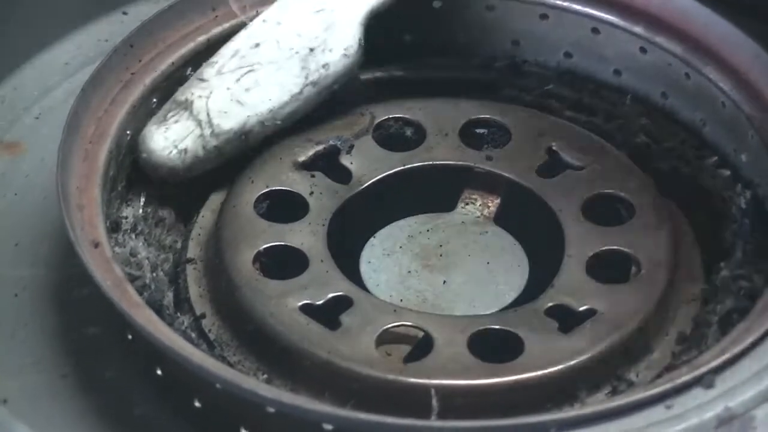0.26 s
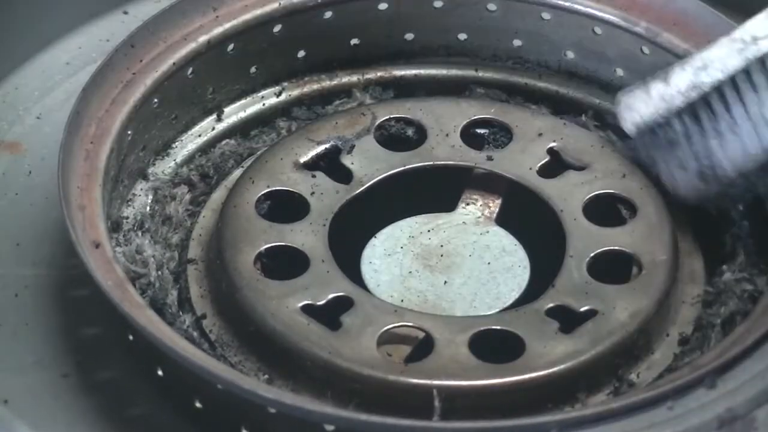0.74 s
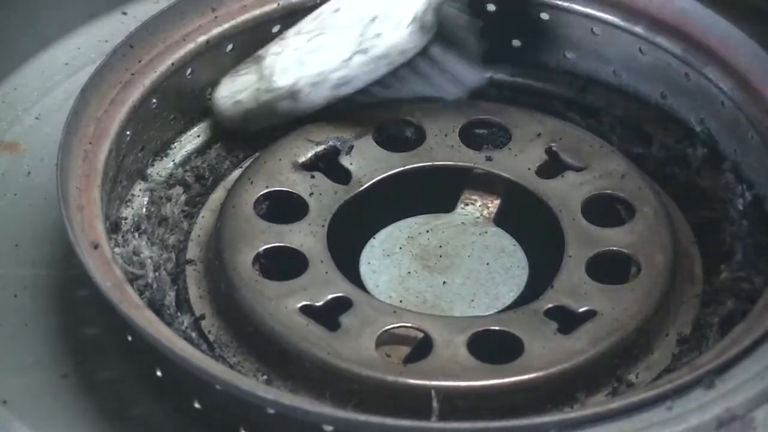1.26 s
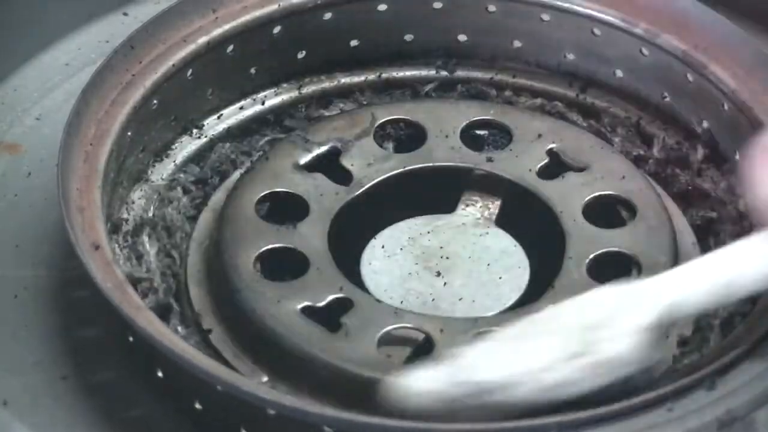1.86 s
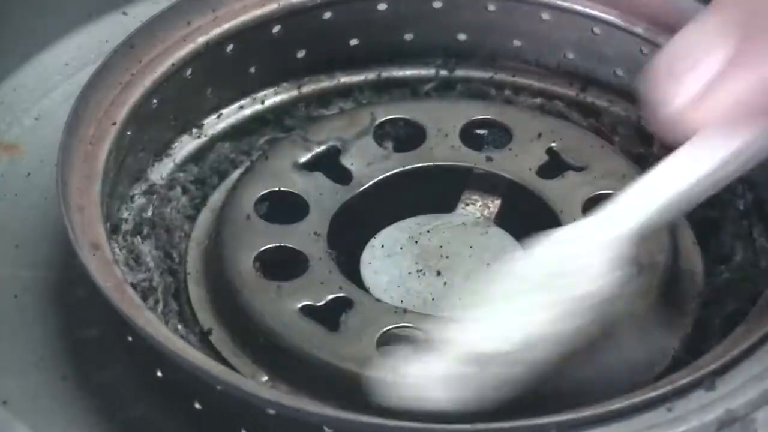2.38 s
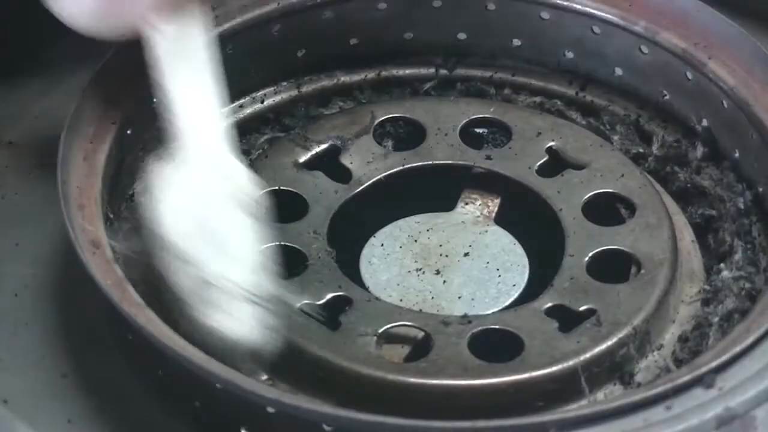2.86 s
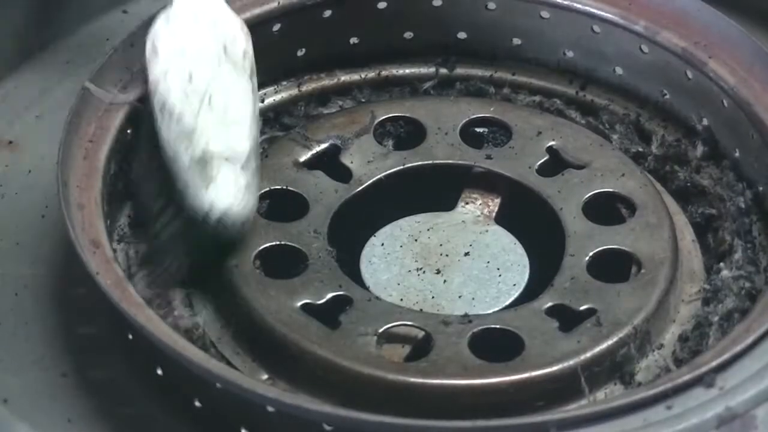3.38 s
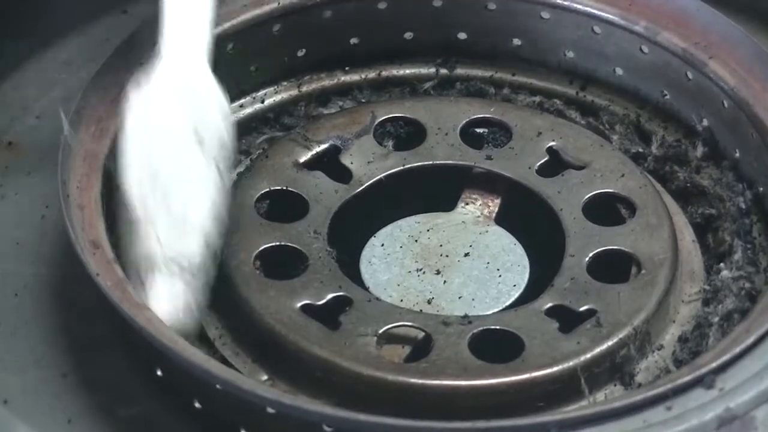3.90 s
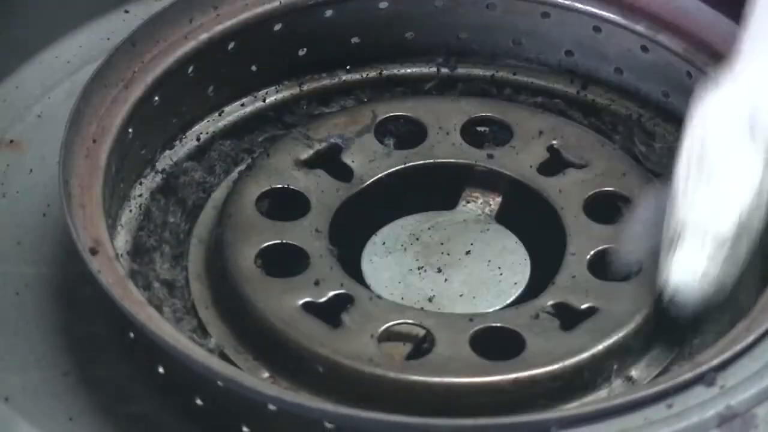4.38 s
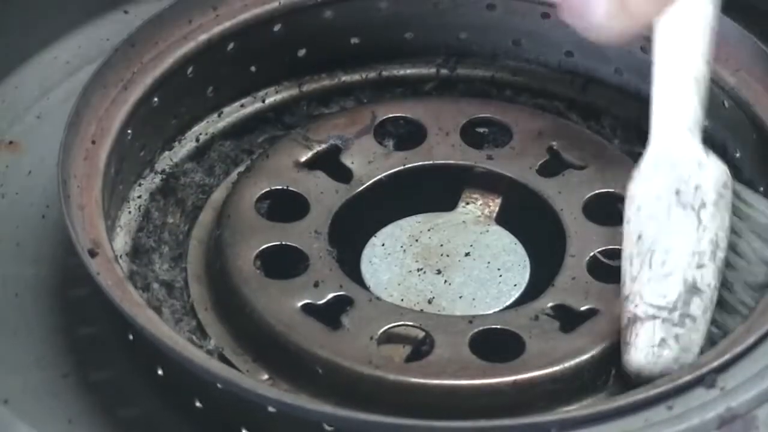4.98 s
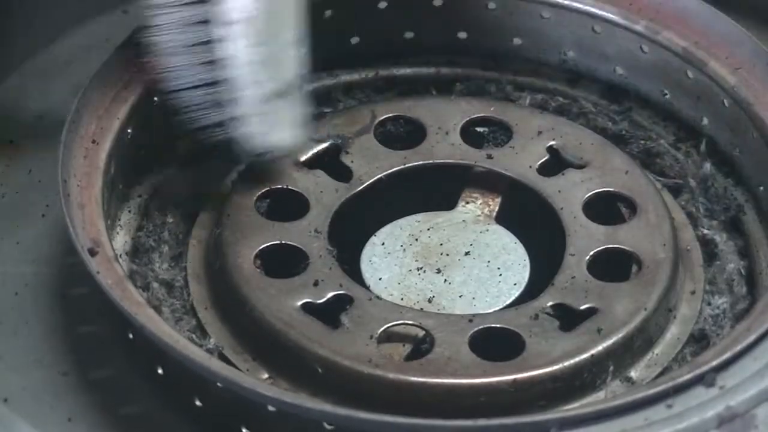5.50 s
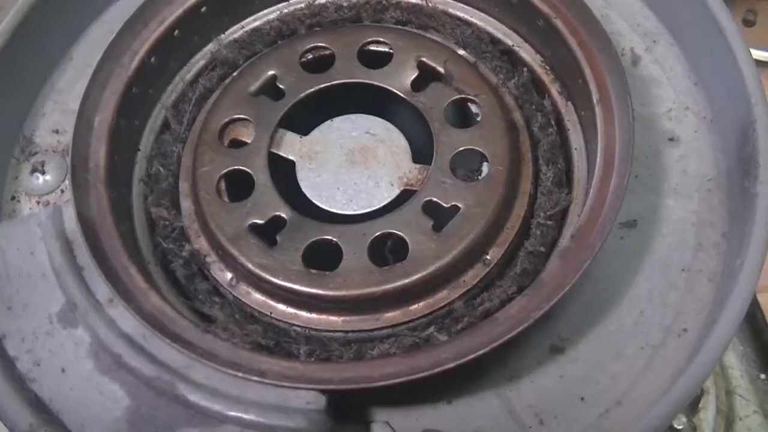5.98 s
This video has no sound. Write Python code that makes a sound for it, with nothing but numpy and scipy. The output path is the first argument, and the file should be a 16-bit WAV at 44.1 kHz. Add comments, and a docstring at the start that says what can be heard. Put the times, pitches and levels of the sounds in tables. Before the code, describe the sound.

A stiff old brush scrubs briskly over a charred wick and ringing thin steel, rasping and scratching close up, with occasional hard knocks.

```python
"""An old toothbrush scrubs the charred wick and steel rim of a heater burner, close to the microphone. From the
start, many tiny bristle slips rasp in the char and ring the steel, stroke after stroke. Bent tufts flick free,
and short squeaks, hollow rubs, twangs of the plastic neck and, near 5 s, brief rattles join in: shaped noise or
gliding tones. From the second second on, the head knocks the burner with noise clicks and ringing tones, and at
2.15 s a ringing sound sets in suddenly. Just before the end the sound breaks off abruptly, leaving only a quiet
room's noise."""
import sys
import numpy as np
from scipy import signal
from scipy.fft import rfft, irfft, next_fast_len
from scipy.io import wavfile
from scipy.ndimage import uniform_filter1d, map_coordinates

SR = 44100
rng = np.random.default_rng(int(sys.argv[2]) if len(sys.argv) > 2 else 0)


def int16_out(signal):
    """Quantize to a 16-bit WAV file."""
    q = np.round(np.clip(np.atleast_2d(signal).T, -1, 1) * 32767)
    wavfile.write(sys.argv[1], SR, q.astype(np.int16))


N = 275625
TIME = np.arange(N) / SR

# strokes of the brush; rise ends at full_press_s, where the hold begins:
# full_press_s, rise_s, hold_s, release_s, steel_ring_db, char_rasp_db, bristle_hiss_db, burner_body_db,
# wall_lift_db (lift of the upper wall resonance)
BRUSH_STROKES = [(0.042, 0.082, 0.037, 0.069, -30.5, -39.5, -38, -56, -2),
                 (0.214, 0.086, 0.032, 0.038, -51, -53, -54, -66, 1),
                 (0.394, .14, 0.031, 0.21, -30.5, -40, -37, -59.5, 3.5),
                 (0.543, 0.42, 0.26, 0.053, -37.5, -44, -45, -65, -0.5),
                 (0.912, 0.14, 0.027, 0.072, -36.5, -44.5, -48.5, -62.5, 3.5),
                 (1.118, 0.34, 0.055, 0.19, -33.5, -44.5, -40.5, -67, 4),
                 (1.226, 0.23, 0.17, .17, -39, -46.5, -49.5, -59, 5),
                 (1.408, 0.0081, 0.028, 0.079, -29.5, -39.5, -37, -61, -0.5),
                 (1.525, 0.012, 0.011, 0.044, -34, -43, -42, -53.5, -3),
                 (1.606, 0.082, 0.046, 0.14, -36, -44.5, -44.5, -64, -7),
                 (1.757, 0.16, .15, 0.073, -30.5, -40, -38.5, -58, -0.5),
                 (1.971, 0.13, 0.051, 0.049, -39.5, -46, -40, -63.5, 10),
                 (2.096, 0.011, 0.0068, 0.018, -51, -48, -62.5, -62, -7),
                 (2.179, 0.023, 0.045, 0.046, -43, -44, -42, -82, -23),
                 (2.35, 0.18, 0.046, 0.17, -29.5, -39, -38.5, -56, -6),
                 (2.65, .12, 0.12, 0.16, -42, -46.5, -46.5, -63, -8),
                 (2.916, 0.054, 0.052, 0.094, -30.5, -40.5, -37.5, -60.5, -6),
                 (3.08, 0.031, 0.013, 0.043, -45, -51.5, -47, -72, 3.5),
                 (3.125, .005, 0.046, .06, -36.5, -42, -43, -62.5, 7.5),
                 (3.351, 0.081, 0.035, 0.054, -34, -44.5, -40, -61.5, -3),
                 (3.444, 0.052, 0.049, .08, -39, -47, -44, -63, -4),
                 (3.524, 0.027, 0.014, 0.046, -31.5, -41.5, -43, -63.5, 4.5),
                 (3.656, 0.084, 0.042, 0.16, -33, -44, -41.5, -58, -7),
                 (3.866, .05, 0.031, 0.15, -43, -52.5, -47, -76, 5.5),
                 (3.941, .018, 0.027, 0.036, -28.5, -40, -42.5, -81, 2),
                 (4.094, 0.037, 0.037, 0.046, -29, -44.5, -37, -80, 0),
                 (4.192, 0.2, 0.18, 0.092, -34.5, -43, -41.5, -59.5, -10),
                 (4.43, 0.19, 0.071, 0.12, -34, -40.5, -40, -63.5, 5.5),
                 (4.578, 0.047, 0.019, 0.033, -38.5, -44.5, -44, -63, 0),
                 (4.709, 0.12, 0.05, 0.026, -33, -42, -41, -62, 3),
                 (4.797, 0.048, 0.094, 0.091, -42, -48.5, -47, -63, -6),
                 (5, 0.017, .01, 0.1, -38, -42.5, -47, -56.5, 6),
                 (5.109, 0.06, 0.12, 0.33, -35.5, -42, -41.5, -66, 2),
                 (5.344, 0.17, 0.052, 0.12, -29.5, -38.5, -35.5, -61.5, -5),
                 (5.513, 0.27, 0.026, 0.033, -32, -49.5, -38.5, -56.5, 4.5),
                 (5.61, 0.01, 0.013, 0.038, -42.5, -65, -47.5, -66, 12),
                 (5.675, .045, 0.052, .1, -32, -48, -40, -61, -1.5),
                 (5.776, 0.15, 0.171, 0.018, -32, -46, -36.5, -70.5, 4.5)]


def scrubbing():
    """Each stroke presses slipping bristles on steel and char; slips clump and bits of char snap."""
    # loudness of each contact across pitch: pitch_hz, relative_level_db (per Hz)
    rim_colour = [(150, -71), (1500, -45.5), (3100, -17), (3800, 1), (4400, 1), (4950, -3.5), (5500, -19.5),
                  (6300, -30.5), (12000, -58)]
    char_colour = [(120, -64), (500, -29.5), (1130, -19), (1300, -9), (1900, -6.5), (2300, -1), (3400, 1.5),
                   (4200, -15.5), (6000, -36), (12000, -22.5)]
    hiss_colour = [(3000, -24.5), (5400, 7.5), (6300, 2), (8000, 1.5), (9300, -3.5), (11000, -5.5),
                   (12500, -2), (15700, -2.5)]
    body_colour = [(60, -14), (160, -35), (250, 0), (340, 4), (450, -3), (900, 0), (1200, -5), (2500, -21),
                   (8000, -56)]
    # the whole burner shifts on its seat with a soft bump: centre_s, level_db, half_length_s
    bumps = [(.197, -55, 0.0075), (4.876, -46.5, .012), (5.483, -50, 0.0048)]

    power = np.zeros((4, N))
    for start, rise, hold, release, steel_db, char_db, hiss_db, body_db, _ in BRUSH_STROKES:
        press = pressure(start, rise, hold, release)
        power[:3] += np.outer(amp([steel_db, char_db, hiss_db]), press) ** 2
        # the low body follows the pressure, but swings less
        power[3] += (amp(body_db) * press ** 0.63) ** 2
    steel_gain, char_gain, hiss_gain, body_gain = np.sqrt(power)

    # slow clumping by whole tufts plus quick clumping by single fibres
    clumps_db = 1.2 * wobble(70) - 0.46 * wobble(360)
    # the same slips ring the steel and hiss in the bristles
    steel_slips = slips(rate=7000)
    rim = burner(steel_slips * steel_gain * amp(clumps_db), rim_colour)
    hiss = burner(steel_slips * hiss_gain * amp(0.61 * clumps_db), hiss_colour)

    crumbs = amp(-14) * slips(rate=30)
    char_slips = slips(rate=3500) + crumbs
    char = burner(char_slips * char_gain * amp(clumps_db), char_colour)

    body_slips = slips(rate=1600) * body_gain * amp(3.2 * wobble(45))
    body = burner(body_slips + bursts(bumps), body_colour)
    return rim + char + hiss + body


def pressure(start, rise, hold, release):
    """Gain of one stroke: the bristles bite, drag with a slight sag and let go."""
    fade_db, sag_db_per_s = 20.5, 4  # gained over the rise and lost over the release; easing in the hold
    t = TIME - start
    fade = np.maximum(-t / rise, 0) + np.maximum((t - hold) / release, 0)
    return amp(-fade_db * np.minimum(fade, 10) - sag_db_per_s * np.clip(t, 0, hold))


def slips(rate):
    """Tiny releases of single bristles, rate a second, of uneven size, in two directions."""
    happens = rng.random(N) < rate / SR
    return unit(happens * rng.standard_normal((2, N)))


def flicks():
    """A whole bent tuft flicks over an edge and lets go within a few milliseconds."""
    # centre_s, level_db
    flick_times = [(0.121, -31), (0.253, -39.5), (.311, -36), (0.341, -30), (0.42, -25.5), (0.4456, -19.5),
                   (.71, -35.5), (1.118, -27), (1.133, -24.5), (1.256, -29), (1.281, -30), (1.351, -33),
                   (1.412, -19), (1.43, -17), (1.495, -30), (1.751, -25), (2.33, -27.5), (2.397, -25),
                   (2.901, -32), (3.129, -31.5), (4.093, -20), (4.212, -26.5), (4.36, -21), (4.761, -32),
                   (5.099, -34.5), (5.385, -25.5), (5.607, -43), (5.9247, -22), (5.946, -25.5), (5.99, -53)]
    # pitch_hz, relative_level_db (per Hz)
    flick_colour = [(100, -68), (400, -37), (1500, -32), (2600, -15.5), (3800, -4.5), (4600, 5),
                    (5100, -7.5), (6000, -14.5), (8500, -26.5), (10500, -19), (16000, -31)]
    half_length_s = 0.0042
    return burner(bursts([(s, db, half_length_s) for s, db in flick_times]), flick_colour)


def travelling(x, patchy_db, wall_width_hz, plate_width_hz):
    """As the brush moves round the burner, the steel's many resonances trade strength."""
    # lift of the top plate's 8580 Hz resonance, high while the brush lies on the plate: time_s, lift_db
    plate_lift = [(0, -2), (.65, 2), (1.1, -6), (1.65, 3), (1.8, 8), (2.4, 2.5), (3.1, -0.5), (4.3, 4.5),
                  (5.05, -3), (5.95, 4)]

    # random strength for each patch of pitch and time, smoothed across both
    spectrum = signal.stft(x, nperseg=1024)[2]
    patches = rng.standard_normal(spectrum.shape[1:])
    patches = uniform_filter1d(patches, size=3, axis=0)
    patches = uniform_filter1d(patches, size=10, axis=1)
    patchy = signal.istft(spectrum * amp(patchy_db * unit(patches)), nperseg=1024)[1][:, :N]

    def lift(db, centre, width):
        resonance = filtered(patchy, lambda hz: 1 / (1 + 2j * (hz - centre) / width))
        return (amp(db) - 1) * resonance

    wall_db = curve([(start + hold / 2, db) for start, _, hold, *_, db in BRUSH_STROKES])
    upper_wall = lift(wall_db, 4680, wall_width_hz)
    # where the upper wall resonance is damped, the lower one takes over
    lower_wall = lift(-0.3 * wall_db, 3980, wall_width_hz)
    plate = lift(curve(plate_lift), 8580, plate_width_hz)
    return patchy + upper_wall + lower_wall + plate


def knocks(click_t60=.02, knock_t60=.03):
    """The head's blow gives a hard click, a hollow knock and a lingering ring of wall and top plate; one sudden
    onset sounds alike."""
    # blows of the head, and at 2.153 s a sudden onset that rings the same way: start_s, click_db, knock_db,
    # plate_ring_db
    blows = [(1.445, -14, -31, -56), (2.1534, -29.5, -51, -39), (2.2499, -23, -32.5, -54),
             (2.4652, -4.5, -27.5, -20.5), (2.4785, -27, -31, -43), (2.5783, -28, -66, -57),
             (2.6938, -27, -26, -54), (2.7063, -21.5, -27.5, -64), (2.739, -7.5, -15, -42),
             (2.7426, -13.5, -17, -48), (4.666, -18.5, -30, -73), (4.8585, -24, -27, -58),
             (4.8615, -33, -25, -61), (4.8992, -45, -32, -59), (4.9393, -50, -36, -65),
             (4.9919, -16.5, -32, -51), (4.9949, -14, -30.5, -55)]
    # pitch_hz, relative_level_db (per Hz)
    click_colour = [(110, -57), (310, -55), (1480, -49.5), (2520, -11), (4420, 6), (5020, 5), (5820, -15),
                    (8520, -12), (10400, -21.5), (15900, -20)]
    knock_colour = [(85, -60), (165, -33.5), (255, -1.5), (490, -1), (790, -1.5), (1380, 0.5), (2020, 4.5),
                    (2980, 8.5), (4500, 1.5), (6450, -1.5), (11900, -40)]
    # the perforated top plate: pitch_hz, level_db (against plate_ring_db), time_to_fall_60_db_s
    plate_modes = [(2912, -29, .2), (3849, 0, .3), (4727, -18, .3), (8721, -19, .28)]
    # the burner's wall: pitch_hz, level_db (against click_db), time_to_fall_60_db_s
    wall_modes = [(1362, -33, .11), (2412, -34, .11), (2912, -33, .11), (4745, -20, .11)]

    click, knock, ring = np.zeros((3, 2, N + SR))
    t = np.arange(SR // 2) / SR
    for start, click_db, knock_db, ring_db in blows:
        first = round(start * SR)
        span = slice(first, first + len(t))
        click[:, span] += amp(click_db - 60 * t / click_t60) * rng.standard_normal((2, len(t)))
        knock[:, span] += amp(knock_db - 60 * t / knock_t60) * rng.standard_normal((2, len(t)))
        # the ring moves in one direction only
        ring[0, span] += amp(ring_db) * ringing(plate_modes, t)
        ring[0, span] += amp(click_db) * ringing(wall_modes, t)
    return burner(click[:, :N], click_colour) + burner(knock[:, :N], knock_colour) + ring[:, :N]


def ringing(modes, t, attack=0.0027):
    """Fading tones with a soft onset (attack in s), struck a little differently each time."""
    ring = np.zeros(len(t))
    for hz, db, t60 in modes:
        level_db = db + rng.normal(0, 1)
        ring += amp(level_db - 60 * t / t60) * np.sin(2 * np.pi * hz * t)
    return ring * (1 - np.exp(-t / attack))


def rubs():
    """The head drags along the bowl and wakes its low, hollow resonance."""
    # centre_s, level_db, half_length_s
    rub_times = [(.402, -42.5, 0.009), (.44, -48.5, 0.011), (.935, -52.5, 0.014), (1.25, -52, 0.021),
                 (2.258, -42.5, 0.0033), (2.275, -51, 0.0056)]
    # pitch_hz, relative_level_db (per Hz)
    bowl_colour = [(150, -36), (550, -12), (800, 4), (950, -2), (1250, -14.5), (4000, -27)]
    return burner(bursts(rub_times), bowl_colour)


def twangs_and_rattles():
    """Twangs of the plastic neck, and near 5 s a few brief rattles: noise, strongest near a few pitches."""
    # centre_s, level_db, half_length_s; the rows at 4.932, 4.971 and 5.052 s are the rattles
    burst_times = [(1.15, -47, 0.015), (3.175, -49, 0.006), (3.535, -45, 0.013), (3.975, -45.5, 0.011),
                   (4.115, -43, 0.011), (4.932, -48, .003), (4.971, -53, 0.007), (5.052, -49.5, 0.0034),
                   (5.128, -43, 0.0048)]
    # pitch_hz, relative_level_db (per Hz)
    burst_colour = [(600, -20), (1400, -32), (1530, 8), (1670, 11.5), (1850, -35), (2280, 0), (2600, -50),
                    (8000, -83)]
    return burner(bursts(burst_times), burst_colour)


def squeaks(jitter=0.011):
    """One bristle sticks and slips regularly along the steel, at a rising, unsteady pitch."""
    # centre_s, half_length_s, pitch_hz (at the centre), glide_hz_per_s, level_db
    squeak_times = [(0.202, .011, 4880, 6950, -50), (.236, 0.014, 5530, 15200, -45),
                    (.967, .006, 5500, 21800, -45), (3.838, .0086, 5600, 9000, -45)]
    out = np.zeros(N)
    for centre, half, hz, glide, db in squeak_times:
        pitch = (hz + glide * (TIME - centre)) * (1 + jitter * wobble(2200))
        swell = amp(db) * np.exp(-((TIME - centre) / half) ** 2 / 2)
        out += swell * np.sin(2 * np.pi * np.cumsum(pitch) / SR)
    return out


def burner(force, colour, size=16384):
    """A force of given colour rings the burner's resonances, never ahead of it, at unchanged power."""
    # resonances of the burner: pitch_hz, width_hz, lift_db
    resonances = [(800, 150, 2), (1390, 70, 5), (1595, 80, 7), (2410, 60, 6), (2712, 45, 4), (2910, 30, 6),
                  (3470, 45, 5), (3849, 28, 6), (3970, 90, 5), (4115, 80, 8), (4755, 60, 14), (6260, 90, 5),
                  (6640, 130, 4), (7170, 45, 6), (7850, 110, 6), (8640, 170, 6), (9720, 35, 8),
                  (13710, 50, 8)]
    hz = np.fft.rfftfreq(size, 1 / SR)
    power_lift = 1
    for centre, width, db in resonances:
        power_lift = power_lift + (amp(db) ** 2 - 1) / (1 + (2 * (hz - centre) / width) ** 2)

    # folding the cepstrum makes the response start at once and die away (minimum phase)
    cepstrum = irfft(np.log(amp(along(colour, hz)) * np.sqrt(np.abs(power_lift))))
    cepstrum[1:size // 2] *= 2
    cepstrum[size // 2 + 1:] = 0
    ring = irfft(np.exp(rfft(cepstrum)))
    return signal.fftconvolve(force, ring[None] / np.linalg.norm(ring), axes=1)[:, :N]


def bursts(rows):
    """Short swells of slips so dense that they are noise; rows of (centre s, level dB, half-length s)."""
    swell = sum(amp(db) * np.exp(-((TIME - s) / half) ** 2 / 2) for s, db, half in rows)
    return swell * slips(rate=SR)


def spread(pair):
    """The two directions of vibration reach the microphone ports differently at each frequency."""
    # pitch_hz, left_right_likeness (1 = the same)
    likeness = [(60, .15), (130, 0.39), (290, .7), (700, 0.91), (1400, 1), (4800, 0.99), (5900, .55),
                (6600, 0.7), (7600, 0.39), (8700, .8), (10400, 0.13), (11300, 0.69), (15000, 0.69)]
    # pitch_hz, left_minus_right_db
    level_lean = [(200, -0.5), (2300, -1), (3200, -5.5), (4500, -2), (5400, -3.5), (6100, 7), (7900, 5),
                  (9100, 2), (10200, -10.5), (11400, .5), (15000, -3)]
    # pitch_hz, left_lead_radians
    left_lead = [(3000, 0.056), (5600, 0.21), (7600, -0.42), (9500, -1.95), (11200, -.1), (12500, -0.13)]

    def mix(hz):
        turn = np.arccos(np.clip(along(likeness, hz), -1, 1)) / 2
        return np.array([np.cos(turn), np.sin(turn)])

    def ports(hz):
        left_over_right = amp(along(level_lean, hz)) * np.exp(1j * along(left_lead, hz))
        # half of the difference goes to each port
        return left_over_right ** np.array([[.5], [-.5]])

    mid, side = filtered(pair, mix)
    return filtered(np.array([mid + side, mid - side]), ports)


def walls(x, t60):
    """A short echo of the room: fading noise that begins after 4 ms; t60 is its 60 dB fall in s."""
    t = np.arange(SR // 2) / SR
    tail = rng.standard_normal((2, len(t))) * amp(-60 * t / t60) * (t > .004)
    return signal.fftconvolve(x, tail / np.linalg.norm(tail[0]), axes=1)[:, :N]


def still_air():
    """The quiet room: steady coloured noise, partly shared by left and right."""
    # pitch_hz, relative_level_db (per Hz)
    room_colour = [(25, -23), (130, -18.5), (260, -6.5), (700, -6), (1200, -7), (2700, 0), (5000, -9),
                   (9000, -11), (15500, -20.5)]
    noise = rng.standard_normal((2, N)) + rng.standard_normal(N)
    return unit(filtered(noise, lambda hz: amp(along(room_colour, hz))))


def amp(db):
    """Decibels to gain."""
    return 10 ** (np.asarray(db) / 20)


def unit(x):
    """Scale to an rms (average strength) of 1."""
    return x / np.sqrt(np.mean(x ** 2) + 1e-20)


def along(points, hz):
    """Read (Hz, value) points on a log axis."""
    f, v = np.transpose(points)
    return np.interp(np.log(hz + 1), np.log(f + 1), v)


def curve(points):
    """Join (s, value) points by straight lines, one value per sample."""
    s, values = np.transpose(points)
    return np.interp(TIME, s, values)


def wobble(rate):
    """A smooth random curve, rate knots a second."""
    return map_coordinates(rng.standard_normal(8192), [TIME * rate], mode="wrap")


def filtered(x, response):
    """Multiply the spectrum of x by a response of frequency."""
    size = next_fast_len(N + SR // 2)
    hz = np.fft.rfftfreq(size, 1 / SR)
    return irfft(rfft(x, size) * response(hz), size)[..., :N]


def scene():
    """The brush on the burner, in a quiet room."""
    strokes = travelling(scrubbing() + flicks(), patchy_db=3.0, wall_width_hz=250, plate_width_hz=470)
    brush = spread(strokes + twangs_and_rattles() + rubs() + knocks()) + squeaks()
    return brush + amp(-13.5) * walls(brush, t60=0.084) + amp(-57.0) * still_air()


def record(dry):
    """Nothing is kept above the band limit."""
    top_hz = 15850
    return filtered(dry, lambda hz: hz < top_hz)


dry = scene()
out = record(dry)
int16_out(out)
```